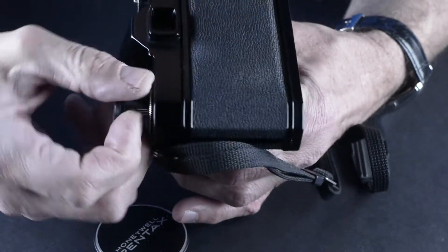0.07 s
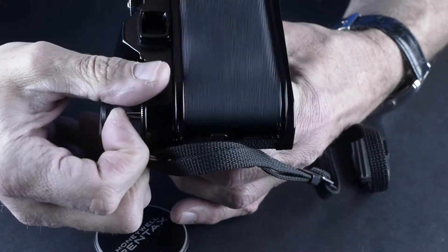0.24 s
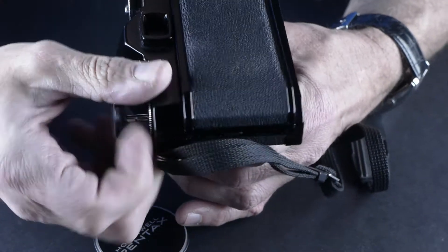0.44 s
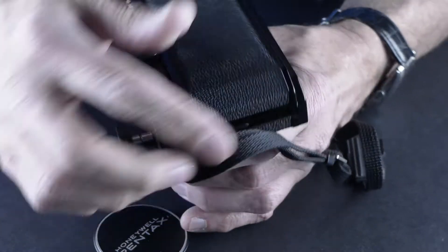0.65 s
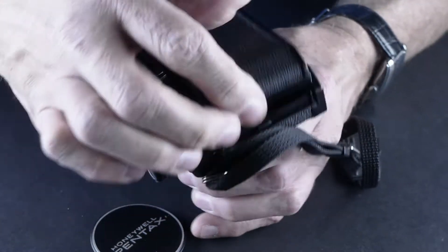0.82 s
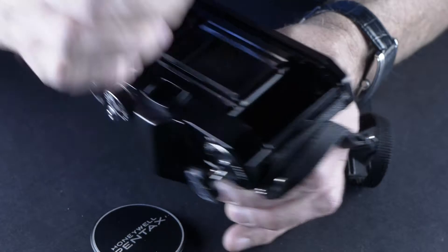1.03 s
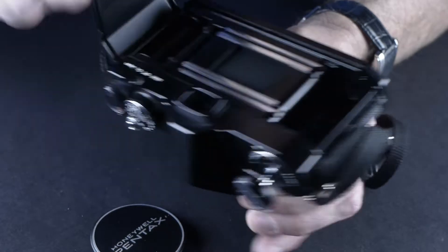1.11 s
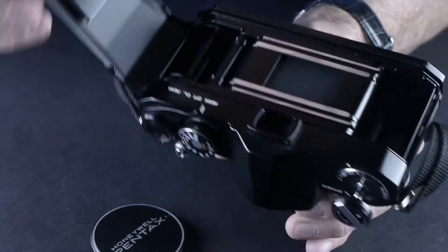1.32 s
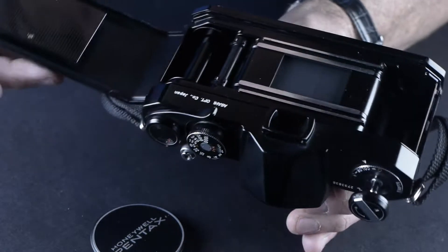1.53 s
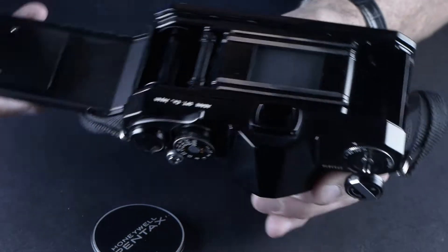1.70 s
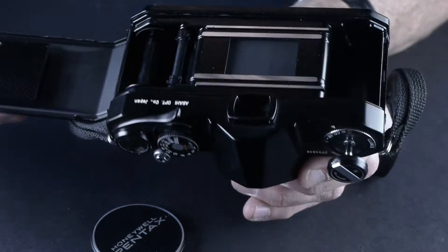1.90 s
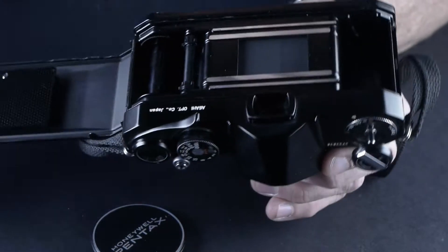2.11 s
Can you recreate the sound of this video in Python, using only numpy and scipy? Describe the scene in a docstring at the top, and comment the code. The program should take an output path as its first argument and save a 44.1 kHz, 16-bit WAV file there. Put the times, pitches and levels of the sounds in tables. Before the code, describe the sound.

Close up in a quiet, slightly live room, a camera's knob clicks and scrapes, its latch cracks open, the door rattles briefly, then faint metal ticks, jingling and finger taps amid hand rustle.

```python
"""In a quiet room, a film camera is held near a stereo microphone: the rewind knob is pulled up, the latch
lets go and the back door pops; small metal parts tick and ring as the door swings open.
Impacts are short noise bursts exciting damped modes; sliding and jingling are dense grit through resonators.
Hands and strap rustle as two uneven noise bands, over the room's coloured hush and a sine of mains hum."""
import sys
import numpy as np
from scipy import signal
from scipy.fft import rfft, irfft
from scipy.io import wavfile
from scipy.ndimage import uniform_filter1d

SR = 44100
rng = np.random.default_rng(int(sys.argv[2]) if len(sys.argv) > 2 else 0)


def volts_from_db(level):
    """Convert decibel levels to linear amplitude ratios."""
    exponent = np.asarray(level, float) / 20
    return 10 ** exponent


def dump_mix(stems):
    """Bounce the given channels to the path in sys.argv[1] as a 16-bit WAV at rate SR."""
    frames = np.atleast_2d(stems).T  # one column per channel
    limited = np.clip(frames, -1, 1)  # hard clip at full scale
    pcm = np.round(limited * 32767).astype(np.int16)
    wavfile.write(sys.argv[1], SR, pcm)


N = 94815  # samples
T = np.arange(N) / SR  # s
HZ = np.maximum(np.fft.rfftfreq(N, 1 / SR), 1.)
WIDE_HZ = 5000  # around and above this the two ports hear increasingly unlike noise
LEFT_RIGHT = np.array([[1], [-1]])


def unit(x):
    """Normalisation: scale to rms 1."""
    return x / np.sqrt(np.mean(x ** 2))


def pan(pan_db):
    """Level difference between channels: left over right in dB."""
    return volts_from_db(LEFT_RIGHT * pan_db / 2)


def noise(colour):
    """Spectral shaping: stereo noise of a colour, coherent in the bass and unlike in the treble."""
    hz, db = np.array(colour, float).T
    gain = volts_from_db(np.interp(np.log(HZ), np.log(hz), db))
    mid, side = rfft(rng.standard_normal((2, N))) * gain
    side = side * HZ / np.hypot(HZ, WIDE_HZ) * 1.55
    return unit(irfft(np.array([mid + side, mid - side]), N))


def curve(rows, col):
    """Amplitude envelope: gain interpolated in dB over time, all but silent outside the table."""
    r = np.array(rows, float)
    return volts_from_db(np.interp(T, r[:, 0], r[:, col], left=-120, right=-120))


def flicker(rate_hz, depth):
    """Random amplitude modulation: a level in dB that glides between random values."""
    hold = max(int(SR / rate_hz), 1)
    steps = np.repeat(rng.standard_normal(N // hold + 1), hold)
    return volts_from_db(depth * 1.46 * uniform_filter1d(steps, hold)[:N])


def strike(events, modes, width, spread_db=3.0, rough_db=3.5):
    """Impact excitation: each short coloured crack also sets nearby damped modes ringing unevenly."""
    out = np.zeros((2, N + SR))
    t = np.arange(SR // 2) / SR
    mode_hz, mode_db, mode_t60 = np.array(modes, float).T[:, :, None]
    treble = signal.butter(1, WIDE_HZ, "high", fs=SR, output="sos")
    for start, db, hz, decay, ring_db, pan_db in events:
        # the crack: a noise burst with a quick rise and exponential decay
        envelope = (1 - np.exp(-t / (0.32 * decay))) * np.exp(-t / decay)
        burst = rng.standard_normal((2, len(t))) * envelope
        edges = [hz / (1 + width), min(hz * (1 + width), .45 * SR)]
        band = signal.butter(2, edges, "band", fs=SR, output="sos")
        crack, other = signal.sosfilt(band, burst)
        scale = volts_from_db(db) / np.sqrt(np.sum(crack ** 2) / (decay * SR)) / 3

        # modes near the crack's colour respond most; each also gets a random gain and phase
        reach = 1 / (1 + ((mode_hz / hz - hz / mode_hz) / width) ** 2)
        luck, phase = rng.standard_normal((2, len(modes), 1))
        mode_gain = volts_from_db(mode_db + spread_db * luck) * reach
        knots = rng.standard_normal((len(modes), 64))
        waver = np.array([np.interp(t, np.linspace(0, t[-1], 64), k) for k in knots])
        damping = volts_from_db(rough_db * waver) * np.exp(-np.log(1000) * t / mode_t60)
        tones = damping * np.sin(2 * np.pi * (mode_hz * t + 3 * phase))
        swell = 1 - np.exp(-t / (.5 * decay))
        ring = swell * np.sum(mode_gain * tones, axis=0)

        mono = scale * crack + volts_from_db(db + ring_db) * ring / 3
        wide = scale * signal.sosfilt(treble, other) * 0.33
        i = int(start * SR)
        out[:, i:i + len(t)] += (mono + wide * LEFT_RIGHT) * pan(pan_db)
    return out[:, :N]


def rattle(rows, colour, modes, ring_db, pan_db):
    """Resonant filtering: dense grit on a level curve, heard bare and through the object's modes."""
    grit = noise(colour) * curve(rows, 1) * flicker(500, 3.2)
    ring = 0
    for hz, db, t60 in modes:
        radius = np.exp(-np.log(1000) / t60 / SR)  # pole radius sets the decay
        poles = [1, -2 * radius * np.cos(2 * np.pi * hz / SR), radius * radius]
        ring = ring + volts_from_db(db) * np.sqrt(1 - radius) * signal.lfilter([1, 0, -1], poles, grit)
    return (grit + volts_from_db(ring_db) * ring) * pan(pan_db)


# colour of the room tone: frequency_hz, relative level_db_per_hz
HUSH_COLOUR = [(15, -39), (25, -29), (451, 1.5), (575, -3), (1020, -7), (1230, -40), (1400, -6),
               (4370, -22), (5730, -16), (16000, -21)]


def hush():
    """Stationary coloured noise for room tone, plus a gently flickering sine of mains hum."""
    hush_db, hum_db, hum_hz = -61, -79, 120  # levels are rms, the hum's before its flicker
    hum = volts_from_db(hum_db) * 2 ** .5 * np.sin(2 * np.pi * hum_hz * T) * flicker(12, 1.6)
    return noise(HUSH_COLOUR) * volts_from_db(hush_db) + hum


# rustle of hands and strap: start_s, low_level_db, treble_level_db
RUSTLE_LEVELS = [(0, -67, -68.5), (.19, -66, -69.5), (.35, -54.5, -44), (.5, -58, -52), (.6, -60, -63.5),
                 (.655, -54.5, -58.5), (.68, -54, -44), (.74, -58.5, -57), (.78, -58.5, -55),
                 (.95, -63, -54), (1.09, -67, -55.5), (1.14, -62, -56), (1.21, -62.5, -57.5),
                 (1.3, -59.5, -56), (1.44, -57.5, -56), (1.5, -58.5, -63), (1.58, -62.5, -62),
                 (1.62, -56.5, -54), (1.72, -60.5, -60), (1.81, -57.5, -59), (1.92, -55, -57),
                 (2.0, -57, -53.5), (2.06, -57.5, -52.5), (2.15, -57, -59)]
# colours of its two bands: frequency_hz, relative level_db_per_hz
LOW_RUSTLE_COLOUR = [(88, -45), (150, -12), (226, -1.5), (331, -8.5), (962, -4), (1160, -5), (3500, -16),
                     (4550, -34), (7700, -120)]
HIGH_RUSTLE_COLOUR = [(1180, -9), (2000, -10.5), (3200, -0.5), (3520, -5.5), (4230, -1.5), (5880, -9),
                      (13800, -10), (16000, -35)]


def rustle():
    """Friction noise: skin and strap moving on the body, a low and a high band, each uneven."""
    low = noise(LOW_RUSTLE_COLOUR) * curve(RUSTLE_LEVELS, 1) * flicker(39.78, 2.16)
    high = noise(HIGH_RUSTLE_COLOUR) * curve(RUSTLE_LEVELS, 2) * flicker(59.3, 2.0)
    return low + high


# dull finger taps: start_s, relative level_db, colour_hz, decay_s, ring_db, pan_db (left over right)
FINGER_TAPS = [(.061, -39, 510, 0.047, 10, 2), (.102, -55, 680, 0.023, -3, 8),
               (.134, -49, 484, 0.024, -6, 3), (.671, -39, 1310, 0.011, -21, .1),
               (1.4621, -33.5, 1500, 0.0013, -15, 1), (1.82, -38, 850, 0.011, -14, 3),
               (1.852, -43, 867, 0.013, 0, 2)]
# modes of the camera body: frequency_hz, relative level_db, t60_s
BODY_MODES = [(307, -6, 0.085), (550, 6, 0.058), (705, -16, 0.11), (1010, -38, 0.15), (1270, -14, 0.096),
              (1500, 10, 0.031)]


def finger_taps():
    """Impact on a damped body: fingers tap the camera and excite its modes."""
    return strike(FINGER_TAPS, BODY_MODES, width=.5)


# scrape of knob shaft and latch bar: start_s, level_db
SCRAPE_LEVELS = [(.202, -48), (.205, -30), (.216, -25), (.222, -28), (.232, -21.5), (.247, -32), (.27, -32),
                 (.291, -35), (.298, -32), (.309, -21.5), (.322, -36), (.34, -55)]
# colour of the scrape: frequency_hz, relative level_db_per_hz
SCRAPE_SPECTRUM = [(120, -60.5), (200, -25), (722, -11), (1560, -4.5), (6050, -4), (6520, -3.5), (7010, 2),
                   (11100, -0.5), (16000, -13)]
# modes of the latch, also rung by the blows: frequency_hz, relative level_db, t60_s
LATCH_MODES = [(527, 0.5, 0.066), (745, 1, 0.043), (850, -5, 0.087), (1255, 0.5, 0.034),
               (2250, -0.5, 0.064), (2462, -13, 0.12), (3090, -4, 0.031), (4386, -12, 0.14),
               (6750, -10, 0.16), (7260, -4.5, 0.038), (7900, -21, 0.034), (9950, -9, 0.046),
               (11120, -4, 0.05), (11300, -3, 0.034), (13300, 1, .07)]


def sliding_latch():
    """Sliding friction: the knob's shaft and the latch bar scrape and excite the latch's modes."""
    return rattle(SCRAPE_LEVELS, SCRAPE_SPECTRUM, LATCH_MODES, ring_db=-10.5, pan_db=0.33)


# knob, latch and door blows: start_s, relative level_db, colour_hz, decay_s, ring_db, pan_db (left over right)
MECHANISM_BLOWS = [(.209, -30, 217, 0.0072, -20, 1.2), (.2085, -27, 8450, .0015, -8, 6),
                   (.2108, -9.5, 2660, 0.0013, 1, -1), (.2108, -8.5, 7340, 0.0022, -18, 7),
                   (.2238, -9, 2250, 0.0065, 3, -0.5), (.243, -22, 13100, 0.0058, 0, 10),
                   (.265, -30, 11070, .003, -7, 4), (.3052, -9, 7150, 0.0029, -5, 2),
                   (.3103, 0, 1326, 0.00065, -16, -1.7), (.3103, -12.5, 700, 0.0054, 3.5, -.6),
                   (.3106, -3, 9300, 0.0026, -5.5, -8.3), (.3165, -9.5, 1260, 0.0021, -14, 3),
                   (.3255, -38, 1410, .002, -12, -.6), (.385, -27.5, 7500, 0.0069, -14, -10),
                   (.391, -24, 6100, 0.0058, -14, 7), (.4283, -6.5, 6730, 0.002, -15.5, -1.2),
                   (.441, -26, 7760, 0.006, -19.5, 1.2)]


def mechanism_blows():
    """Impact excitation: knob, latch and door blows ring the latch's modes."""
    return strike(MECHANISM_BLOWS, LATCH_MODES, width=.9)


# low rattle of the freed door: start_s, level_db (before a 2 dB cut)
SHUDDER_LEVELS = [(0.33, -33), (0.338, -50.5), (0.384, -36), (0.666, -61), (0.672, -57), (0.78, -73.5)]
# colour of the rattle: frequency_hz, relative level_db_per_hz
SHUDDER_SPECTRUM = [(88, -55.5), (150, -42), (524, 1.5), (609, -2), (1230, -0.5), (1660, -2.5), (2040, -49),
                    (3040, -8), (4000, -40), (5200, -53), (8800, -120)]


def door_shudder():
    """Amplitude-modulated noise: the freed door shudders in a low, flickering rattle."""
    return noise(SHUDDER_SPECTRUM) * curve(SHUDDER_LEVELS, 1) * flicker(150, 2.9) * volts_from_db(-2.0)


# light metal ticks: start_s, relative level_db, colour_hz, decay_s, ring_db, pan_db (left over right)
METAL_TICKS = [(.7917, -34, 3360, 0.0052, -6, -3), (.849, -27.5, 1850, .004, -6, -0.5),
               (.859, -35, 7880, .004, 21.5, -22), (.874, -34, 6400, .004, 3.5, 1),
               (1.102, -36, 1694, 0.0029, -12, -2), (1.109, -34.5, 10300, 0.0042, 6.5, -4),
               (1.126, -48.5, 5000, .005, 16, -11), (1.167, -47, 8000, .004, 11, 4),
               (1.2227, -34, 11000, 0.0034, -13, -1.2), (1.291, -34.5, 5000, 0.0034, 5, 2),
               (1.296, -32.5, 7200, .004, 13, -4), (1.3665, -25, 12000, .002, -8, 5),
               (1.372, -30, 3540, .003, 4, 0), (1.374, -27, 12000, .005, -12, -1),
               (1.384, -40.5, 4360, 0.0024, 9.5, 2.2), (1.395, -57, 4520, 0.003, 4, -5)]
# modes of the small metal parts, also rung by the jingle: frequency_hz, relative level_db, t60_s
METAL_MODES = [(1863, 3.5, 0.077), (2530, -4.5, 0.099), (3400, -14, 0.094), (4430, -13.5, 0.22),
               (4533, -5.5, 0.096), (4610, -8, 0.12), (6332, -4.5, 0.047), (6437, -13, 0.11),
               (8020, -5.5, 0.045), (8660, -20, 0.07), (11540, -5, 0.044), (11800, -10, 0.032),
               (13280, -1, 0.075)]


def metal_ticks():
    """Impact excitation: light ticks ring the modes of small metal parts."""
    return strike(METAL_TICKS, METAL_MODES, width=0.57)


# strap ring against its lug: start_s, level_db
JINGLE_LEVELS = [(.84, -63), (.846, -51), (.851, -40.5), (.864, -36), (.87, -42), (.879, -38),
                 (.893, -40.5), (.915, -54), (.95, -76), (1.02, -72)]
# colour of the jingle: frequency_hz, relative level_db_per_hz
JINGLE_SPECTRUM = [(470, -55.5), (800, -14), (4510, -10), (5380, -12), (6410, -4), (13600, -12),
                   (16000, -24)]


def strap_jingle():
    """Dense contact noise in resonance: a strap ring jingles against its lug."""
    return rattle(JINGLE_LEVELS, JINGLE_SPECTRUM, METAL_MODES, ring_db=-8.5, pan_db=-2.5)


def camera():
    """Superposition: the sum of all the sounds made by the camera's parts."""
    impacts = finger_taps() + mechanism_blows() + metal_ticks()
    return impacts + sliding_latch() + door_shudder() + strap_jingle()


# reverberation time of the room: frequency_hz, t60_s
ROOM_DECAY = [(200, 0.79), (1000, 0.65), (4000, 0.74), (12000, 0.18)]


def room(x):
    """Reverberation: convolution with a small room's decaying noise tail, shortest in the high treble."""
    room_db = -10.5  # energy of the tail
    t, tail = np.arange(SR) / SR, 0
    decay_hz, decay_t60 = np.array(ROOM_DECAY, float).T
    for hz in 125 * 2. ** np.arange(0, 7):  # octave bands
        top = hz * 2 ** .5 * (1.3 if hz > 7000 else 1)
        band = signal.butter(2, [hz / 2 ** .5, top], "band", fs=SR, output="sos")
        mid, side = signal.sosfilt(band, rng.standard_normal((2, SR)))
        t60 = np.interp(np.log(hz), np.log(decay_hz), decay_t60)
        stereo = mid + min(hz / WIDE_HZ, 1) * side * LEFT_RIGHT
        tail = tail + stereo * np.exp(-np.log(1000) * t / t60)
    tail = tail * (t > .003)  # s before the first reflections
    tail = tail / np.sqrt(np.sum(tail ** 2) / 2)
    return volts_from_db(room_db) * signal.fftconvolve(x.mean(0)[None], tail, axes=1)[:, :N]


def scene():
    """Propagation delay and weak bass radiation: small parts reach the right port a moment later."""
    low_hz, port_lag_s = 174, 2.5e-5
    bass_cut = signal.butter(2, low_hz, "high", fs=SR, output="sos")
    near = signal.sosfilt(bass_cut, camera())
    near[1] = irfft(rfft(near[1]) * np.exp(-2j * np.pi * HZ * port_lag_s), N)
    return near + room(near) + rustle() + hush()


def top_cut(x):
    """Nothing passes above the cut-off."""
    return signal.sosfilt(signal.butter(12, 16820, fs=SR, output="sos"), x)


def record(dry):
    """Signal chain: the finished mix goes to its final stage."""
    return top_cut(dry)


dry = scene()
out = record(dry)
dump_mix(out)
```